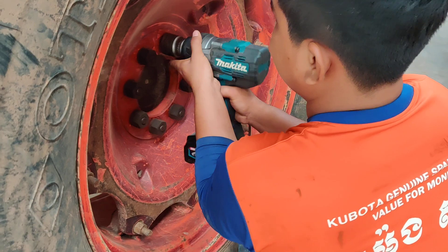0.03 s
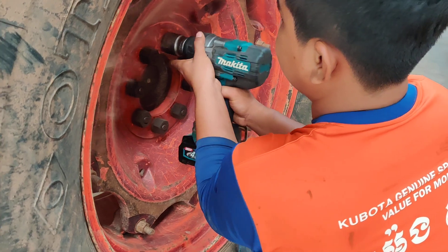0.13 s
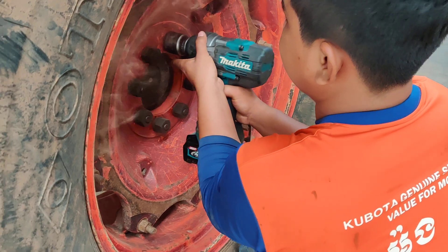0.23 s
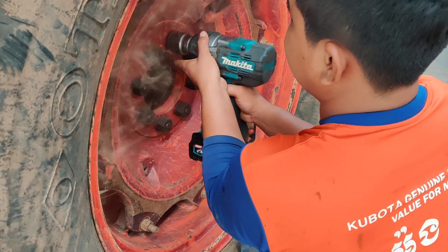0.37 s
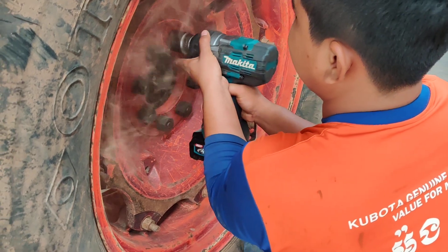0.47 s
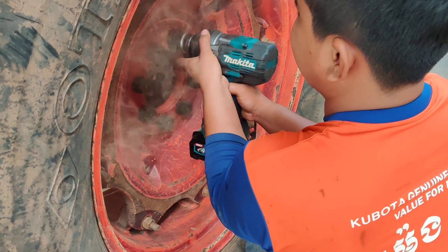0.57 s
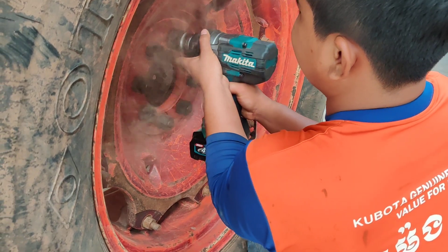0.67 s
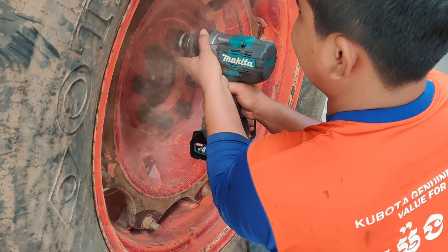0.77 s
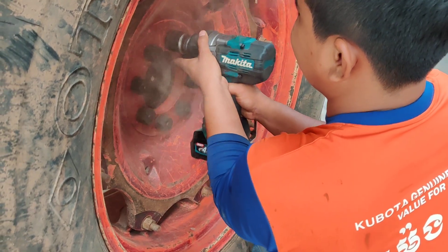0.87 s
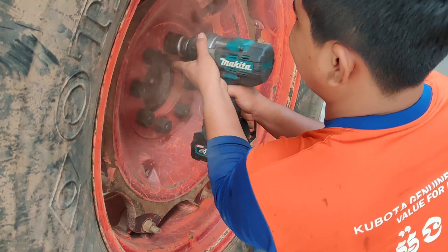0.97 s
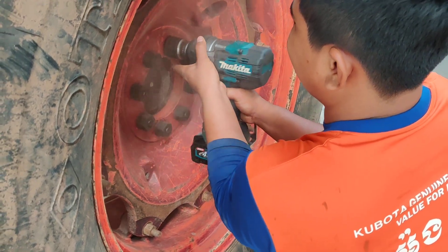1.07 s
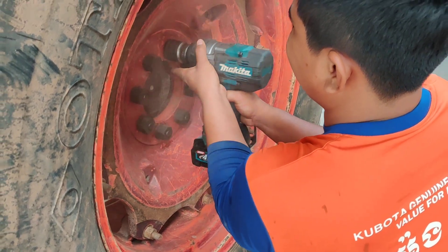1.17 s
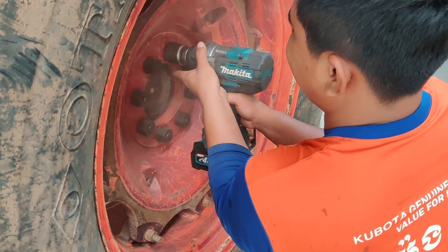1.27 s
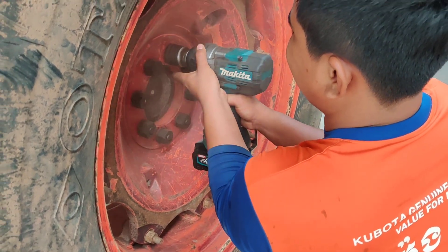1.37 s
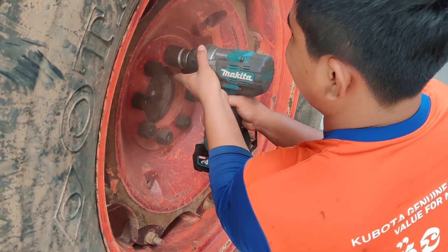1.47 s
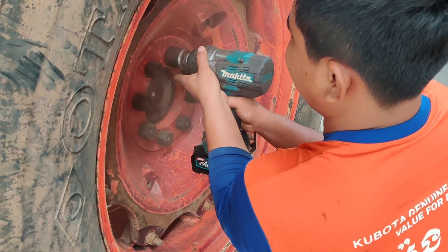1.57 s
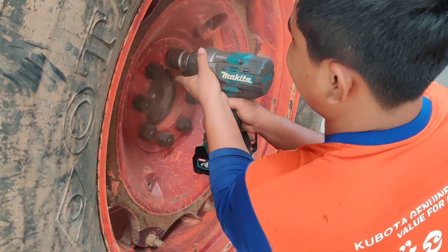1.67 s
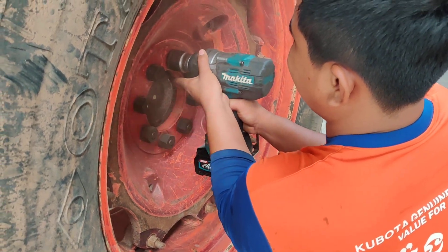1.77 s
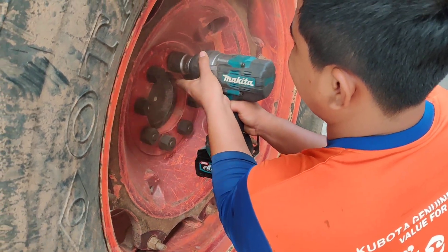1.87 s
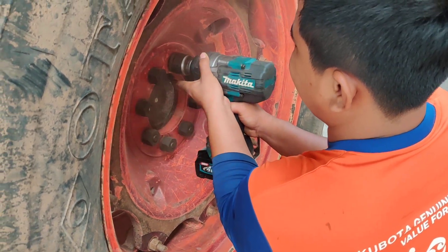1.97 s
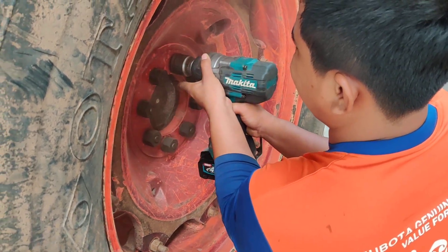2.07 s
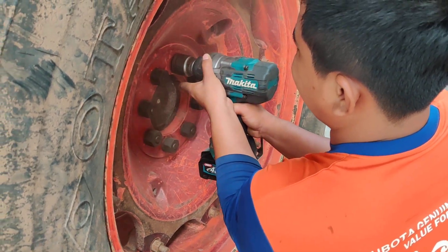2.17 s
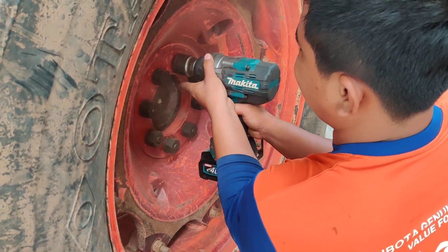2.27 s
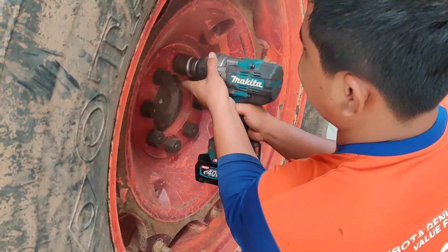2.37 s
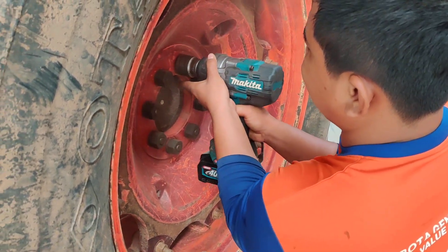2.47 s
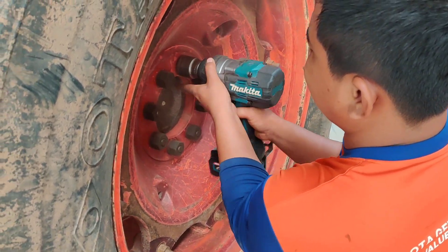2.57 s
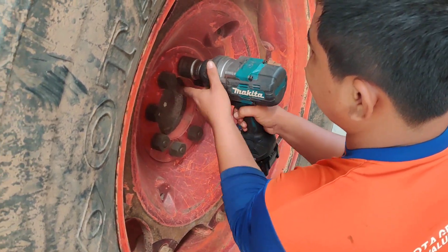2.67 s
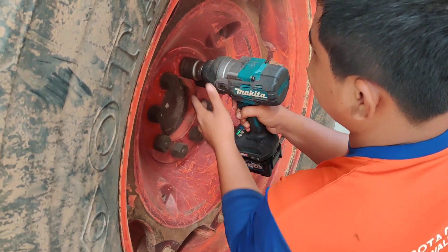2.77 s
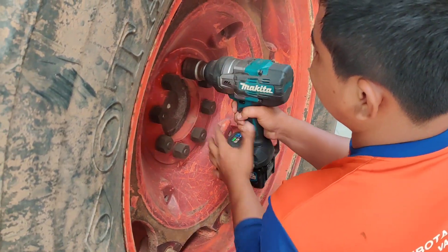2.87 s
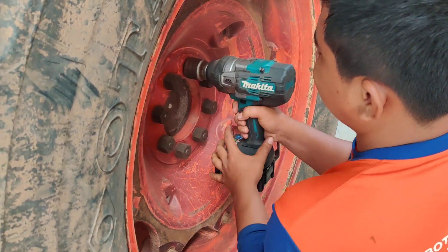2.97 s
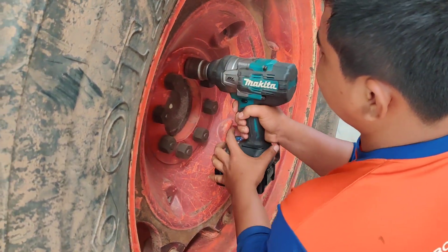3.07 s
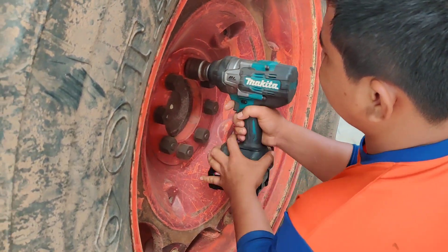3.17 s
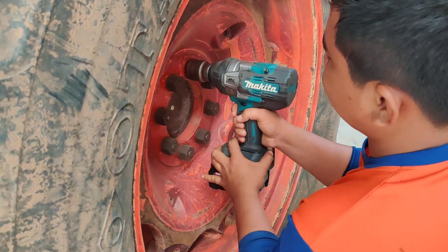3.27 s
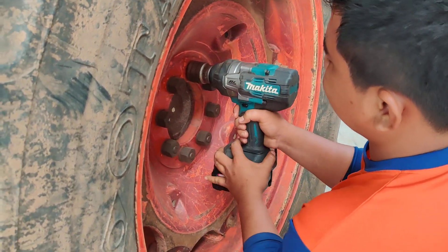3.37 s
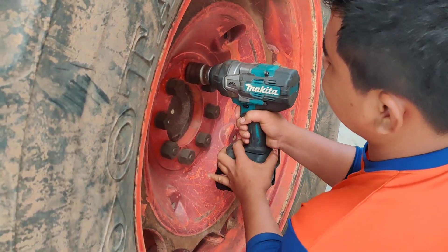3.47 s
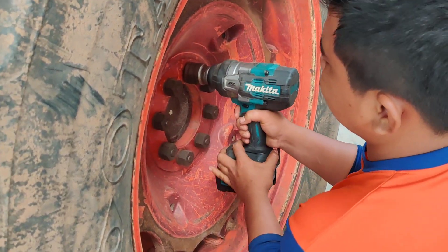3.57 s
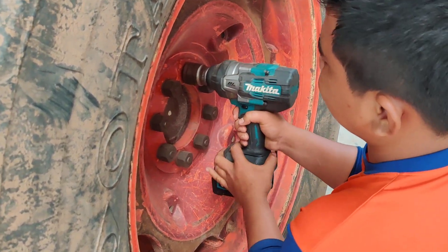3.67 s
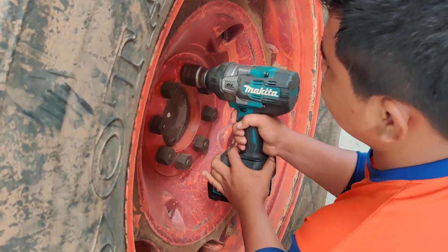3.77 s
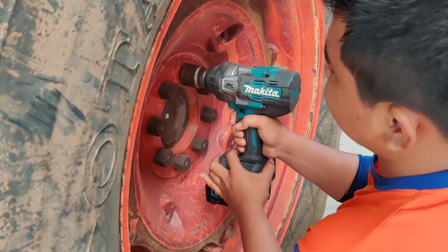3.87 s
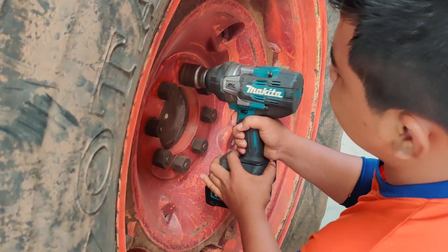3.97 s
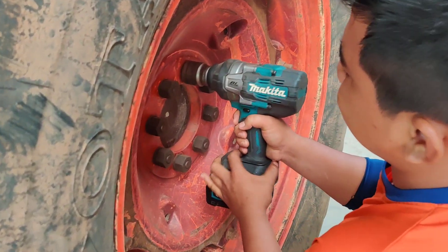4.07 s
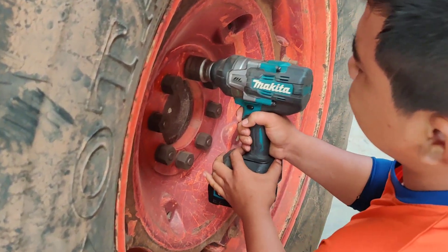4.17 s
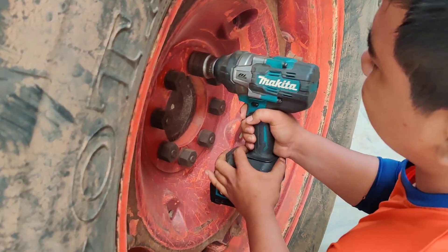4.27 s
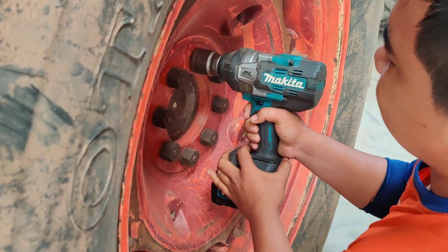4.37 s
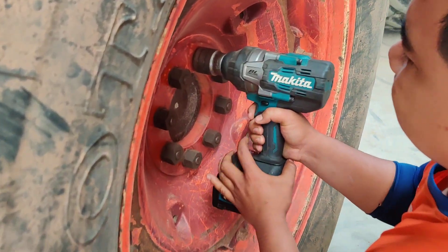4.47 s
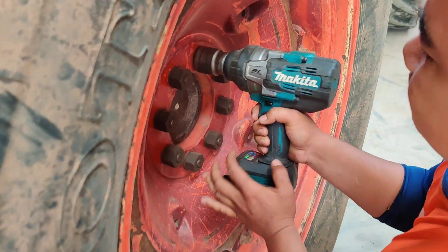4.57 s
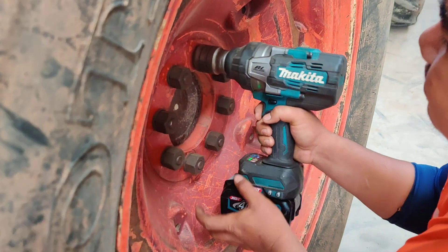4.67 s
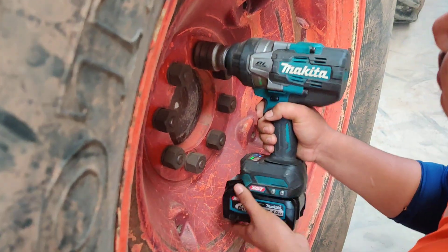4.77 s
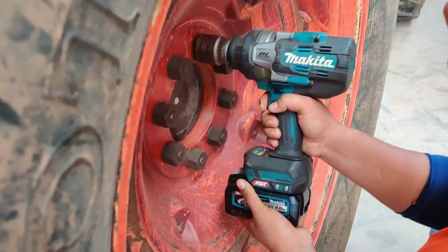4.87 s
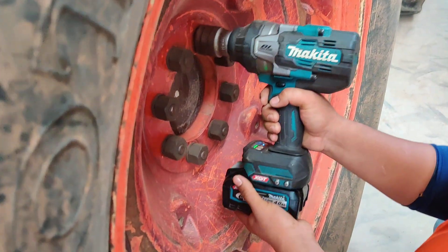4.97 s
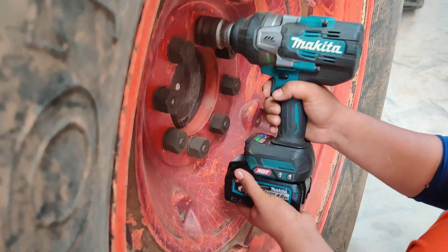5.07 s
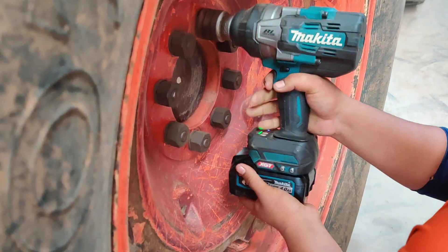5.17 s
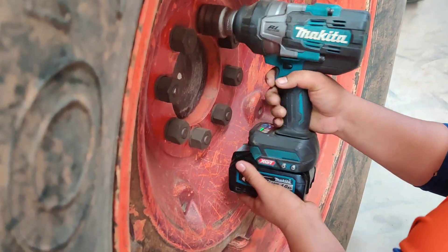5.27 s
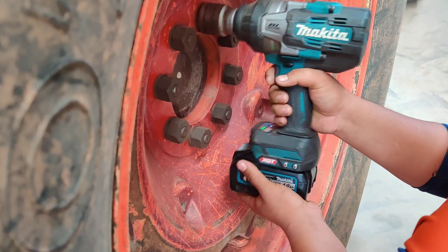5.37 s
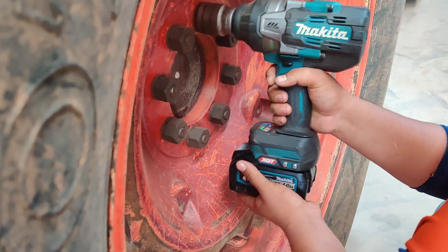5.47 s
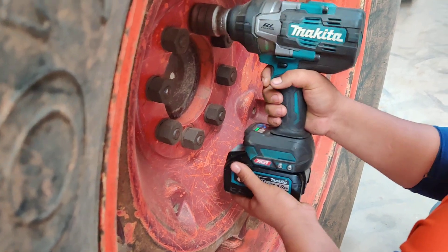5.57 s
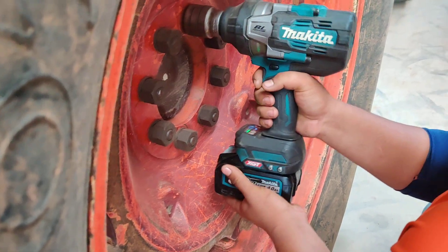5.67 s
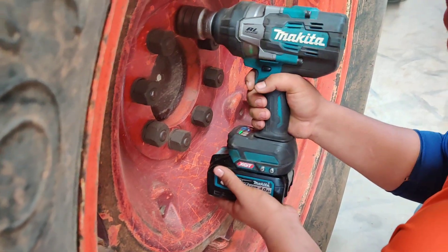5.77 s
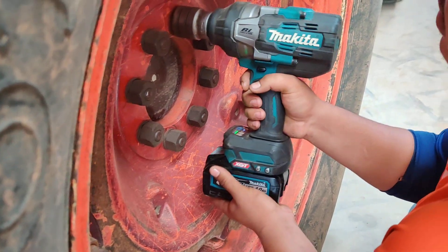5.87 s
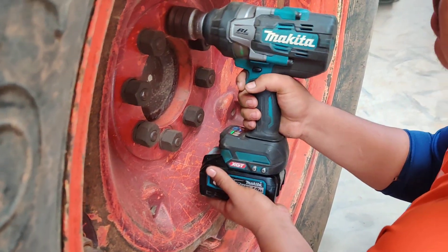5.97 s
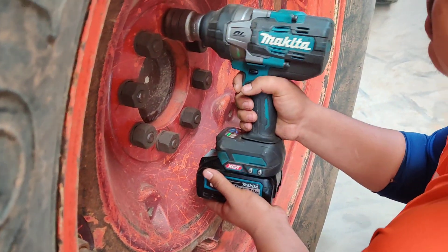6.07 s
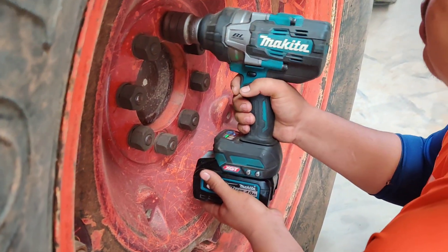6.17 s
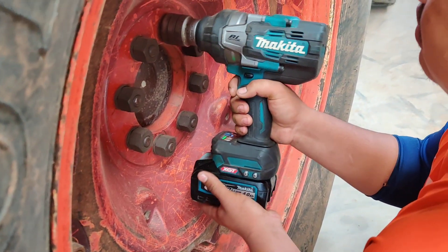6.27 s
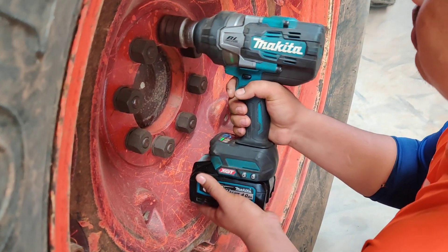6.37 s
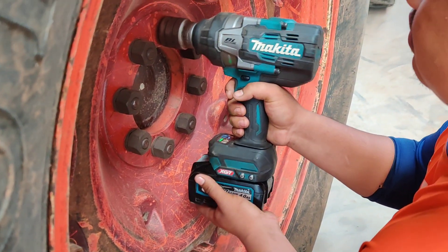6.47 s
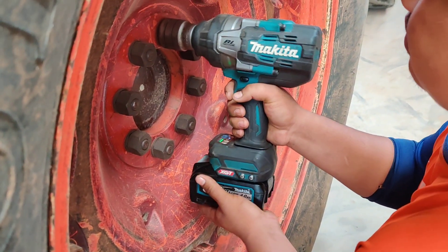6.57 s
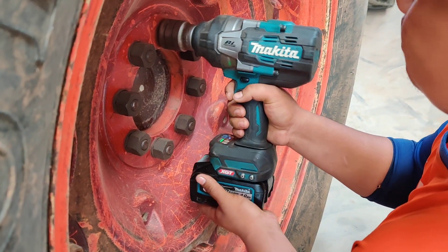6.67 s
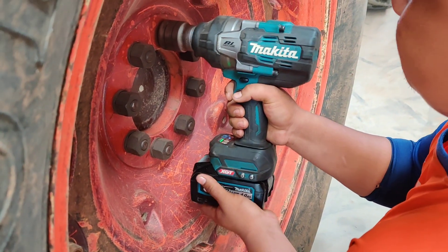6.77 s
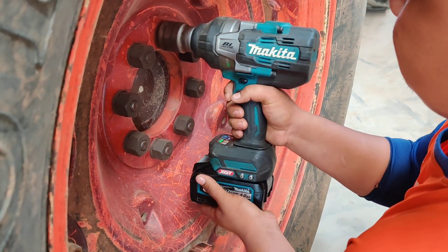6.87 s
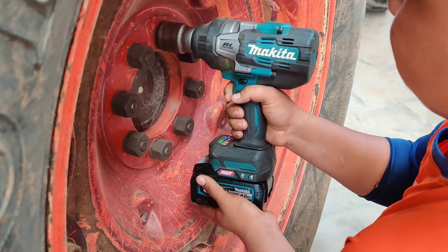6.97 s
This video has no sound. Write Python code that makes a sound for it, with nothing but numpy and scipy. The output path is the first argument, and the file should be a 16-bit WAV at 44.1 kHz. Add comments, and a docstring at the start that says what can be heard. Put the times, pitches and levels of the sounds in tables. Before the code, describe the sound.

Silence for about 0.15 seconds, then an impact wrench bites on a tractor's wheel nut, swelling to full force within a few tenths. It hammers at about 39 blows a second, fusing into a rough, buzzing metallic roar with bright ringing between 2 and 6 kHz. The two close microphones overload: gritty treble spray, low crackle, thumping offset jumps. Brief slips soften it near 0.3, 1.0, 1.7 and 2.0 seconds. At 2.5 it stops; the loose socket chatters in dense light knocks, surging around 2.7 to 2.9, with short bright cracks at 2.6 and just before 3.0. Hammering resumes at 3.0, pauses at 3.3 for quieter chatter, bursts at 3.5, and breaks for an instant at 3.6. From 3.64 it runs continuously past 7 seconds, crackling harder near 4.6 and 4.95, dipping at 4.3 and 4.8, then pulsing gently in an even rhythm, ring gradually fading, ending mid-hammering.

```python
"""A cordless impact wrench hammers on a tractor's wheel nut, about 39 blows a second, close to two microphones.
Each blow excites noise-fed modes of socket, nut and wheel over a denser clang.
It also overloads both microphones: treble splatter, low crackle and jumps in offset.
Three times the hammering stops and the loose socket chatters in dense light knocks.
The hardest single knocks, around the pauses and at starts of runs, are short bright cracks."""
import sys
import numpy as np
from scipy import signal
from scipy.fft import rfft, irfft
from scipy.io import wavfile
from scipy.ndimage import uniform_filter1d

SR = 44100
rng = np.random.default_rng(int(sys.argv[2]) if len(sys.argv) > 2 else 0)


def transcribe(u):
    """Save the signal u as a 16-bit wav file named by the first command-line argument.

    u: samples, shape (n,) or (channels, n), limited to [-1, 1]; the rate is SR.
    q: integer samples, one column per channel.
    """
    v = np.clip(np.atleast_2d(u).T, -1, 1)
    q = np.round(v * 32767).astype(np.int16)
    wavfile.write(sys.argv[1], SR, q)


N = 310154
TIME = np.arange(N) / SR  # s
FREQ = np.fft.rfftfreq(N, 1 / SR) + 1e-3  # Hz, kept above 0 for the logarithm

# runs of hammering: (start [s], soft start [dB], base ring [dB], base treble splatter [dB],
# base low crackle [dB], ring left minus right [dB])
RUNS = [(0.155, 12.5, -12.5, -15, -26.5, -0.5), (3.02, 0.5, -16.5, -16, -28, 0.5),
        (3.515, 1, -14.5, -14, -26.5, -2), (3.635, 3, -15, -14, -28.6, 1)]
# the nut gives way and the hammer rests until the next run: (time [s])
STOPS_S = (2.52, 3.31, 3.59)
# colour of the two microphone ports: (frequency [Hz], left minus right [dB])
PORTS = [(100, -3.5), (600, -2.5), (2000, -1), (4600, -0.5), (5600, -8.5), (7000, -7.5), (8000, 0),
         (9000, 5), (12000, 0.5), (15500, 0)]
# treble overload spectrum: (frequency [Hz], relative level [dB])
SPLATTER = [(500, 1.5), (2000, -7.5), (5000, -4.5), (7500, -9), (9000, -6), (11500, -5.5), (13000, -4),
            (14500, -1), (15700, -1)]


def undb(db):
    """Decibels to gain."""
    return 10 ** (np.asarray(db) / 20)


def curves(table):
    """Columns of a table, joined by straight lines in time."""
    s, *columns = np.transpose(table)
    return [np.interp(TIME, s, column) for column in columns]


def unit(x):
    """Scale to rms 1."""
    return x / np.sqrt(np.mean(x ** 2))


def pan(db):
    """Left and right gains for a level difference."""
    return undb(np.array([[1], [-1]]) * db / 2)


def shape(points):
    """Decibels at every frequency, interpolated over log frequency from (Hz, dB) points."""
    hz, db = np.transpose(points)
    return np.interp(np.log(FREQ), np.log(hz), db)


def resonance(hz, width_hz):
    """Response of one damped mode, gain 1 at its centre."""
    return 1 / (1 + 1j * (FREQ ** 2 - hz ** 2) / (FREQ * width_hz))


def radiation():
    """Small steel parts radiate little bass."""
    return 1 / (1 + (1500 / FREQ) ** 4)


def filtered(x, response):
    """Pass a sound through a frequency response."""
    return irfft(rfft(x) * response, N)


def lag(x, seconds):
    """One-pole smoothing: an impulse becomes a decay."""
    pole = np.exp(-1 / (SR * seconds))
    return signal.lfilter([1 - pole], [1, -pole], x)


def noise():
    """Unrelated white noise at the two ports."""
    return rng.standard_normal((2, N))


def walk(rate_hz):
    """Random levels held 1 / rate_hz and slewed twice; spread near 1."""
    hold = int(SR / rate_hz)
    held = np.repeat(rng.standard_normal(N // hold + 1), hold)
    return 1.46 * uniform_filter1d(uniform_filter1d(held, hold), hold)[:N]


def swell(s, half_s):
    """Smooth bump of height 1 around a moment."""
    return np.exp(-((TIME - s) / half_s) ** 2)


def bursts(at, scatter_db, attack_s, decay_s):
    """Envelope of uneven blows; the two ports feel each blow partly alike."""
    left, right, common = rng.standard_normal((len(at), 3)).T
    kicks = np.zeros((2, N))
    kicks[:, at] = undb(scatter_db * (np.array([left, right]) + common) / np.sqrt(2))
    return unit(lag(lag(kicks, attack_s), decay_s))


def hammering():
    """1 while the nut resists and the hammer strikes, 0 while the socket is loose."""
    started = sum(1. * (TIME >= run[0]) for run in RUNS)
    stopped = sum(1. * (TIME >= s) for s in STOPS_S)
    return started - stopped


def blow_samples(bite, jitter_s):
    """The hammer drops onto the anvil once per turn of its cam, as long as the nut resists."""
    # hammer speed: (time [s], rate [blows/s])
    speed = [(0.16, 39.28), (0.8, 38.65), (1.4, 39.47), (2.2, 39.33), (2.4, 38.77), (3.6, 37.9),
             (3.8, 38.62), (4.8, 38.43), (5.0, 38.79), (5.8, 38.62), (6.2, 38.84), (6.4, 38.08),
             (6.6, 38.93), (7.0, 38.61)]
    first_blow_s = 0.1626
    turns = np.cumsum(curves(speed)[0]) / SR
    turns -= np.interp(first_blow_s, TIME, turns)
    blow_s = np.interp(np.arange(int(turns[-1]) + 1), turns, TIME)
    blow_s = blow_s + jitter_s * rng.standard_normal(len(blow_s))
    at = np.clip((blow_s * SR).astype(int), 0, N - 1)
    return at[bite[at] > .5]


def effort():
    """Runs build to full force, dip at slips and change at pushes: drives ring, overload and jolts (dB)."""
    # the socket slips and blows land softer: (time [s], half-length [s], ring depth [dB])
    slips = [(0.308, 0.036, 7.5), (0.975, .025, 4), (1.083, 0.031, 2), (1.67, .04, 5), (1.97, 0.039, 8),
             (3.076, 0.019, 8), (3.601, 0.023, 16), (4.333, 0.026, 6), (4.837, 0.024, 7),
             (6.715, 0.065, 3.5), (7.03, 0.045, 4.5)]
    # the tool is leant on: (time [s], half-length [s], ring change [dB], low crackle change [dB])
    pushes = [(0.53, 0.03, -1.5, 1), (0.907, 0.046, 0, 0.5), (1.3, 0.28, 1, -0.4), (1.786, 0.083, -1, 3),
              (2.06, 0.055, 3, -0.6), (3.762, 0.2, 0.8, .3), (3.965, 0.079, 1, 1), (4.568, 0.2, -0.34, 3),
              (4.954, 0.068, 2.5, 6)]
    build_s = 0.091  # time constant of the soft start, in dB
    fade_db_per_s, wobble_db = 0.48, 0.63  # ring weakens through a run; tool rocks in the hands
    slip_share = 0.21  # part of a slip's depth that the overload follows
    give_db, give_s = 4, 0.033  # blows next to a stop lose low end: depth, half-length
    # late in the last run the nut turns steadily and the ring dips in an even rhythm
    turning_from_s, turning_period_s, turning_dip_db, turning_dip_s = 4.345, .158, 2, 0.03
    jolt_full_db, jolt_give_db = -11, 17  # offset jumps at full force; loss next to a stop
    jolt_slope, jolt_push = 2.2, 0.66  # dB lost per dB of soft start; dB gained per dB of crackle change

    runs = np.array(RUNS)
    current = np.maximum(np.searchsorted(runs[:, 0], TIME, side="right") - 1, 0)
    start, soft, ring, splatter, crackle, side_db = runs[current].T
    age = np.maximum(TIME - start, 0)
    weak = soft * np.exp(-age / build_s)
    slip = sum(db * swell(s, half_s) for s, half_s, db in slips)
    turning = np.arange(turning_from_s, TIME[-1], turning_period_s)
    slip = slip + turning_dip_db * sum(swell(s, turning_dip_s) for s in turning)
    push_ring, push_low = sum(np.outer(dbs, swell(s, half_s)) for s, half_s, *dbs in pushes)
    give = sum(swell(s, give_s) for s in STOPS_S)

    ring_db = ring - weak - fade_db_per_s * age - slip + push_ring + wobble_db * walk(rate_hz=13)
    eased = weak + slip_share * slip
    crackle_db = crackle - eased + push_low - give_db * give
    jolt_db = jolt_full_db - jolt_slope * weak + jolt_push * push_low - jolt_give_db * give
    return ring_db, side_db, splatter - eased, crackle_db, jolt_db


def clang(at):
    """Blows ring socket, nut and wheel; the seating decides which modes speak most."""
    # seating of the socket on the nut: (time [s], grip [0 first, 1 second, 2 third])
    seating = [(0.15, 0.038), (0.9, 0.43), (1.3, 0.6), (1.8, 0.74), (2.6, 0.33), (3.5, 0.83), (3.9, 0.72),
               (4.4, 1.4), (4.9, 1.26), (5.7, 1.73), (7.03, 1.52)]
    # modes of socket, nut and wheel: (frequency [Hz], width [Hz], relative level in first, second
    # and third grip [dB, dB, dB], left minus right [dB])
    steel_modes = [(2173, 120, -5.5, 0.5, 6.5, 2), (2730, 55, -18, -2, 10, 2.5),
                   (2923, 99, -16, -0.5, 6.5, -2), (2987, 46, -5, 13.5, 1.5, 7.5),
                   (3277, 44, -0.5, 6.5, 3.5, -6.5), (3840, 27, 1, -7, 4, 16),
                   (3890, 41, 5.5, 9.5, 12, 5.5), (4104, 45, 1, -12, 1, 2), (4194, 54, 4, 7.5, 6, 0),
                   (4300, 79, -4, -6, 0, -2), (4590, 48, -2, -3, -8, 8), (4870, 120, -2, -15, 7, 2),
                   (4953, 33, 7, 9.5, 6.5, 9), (5650, 52, 9.5, 2, 10.5, -2), (5580, 24, 8.5, -8.5, 0, -14),
                   (7930, 176, -10.5, 5.5, 7.5, -5.5)]
    # dense higher-order ringing under the modes: (frequency [Hz], relative level [dB])
    dense_colour = [(300, -21), (800, -8.5), (1300, -8.5), (1900, -1), (2600, -2.5), (4200, 1.5),
                    (5700, -2.5), (6300, -4), (7700, -1), (8600, -14), (11000, -10), (15500, -74)]
    seat = curves(seating)[0]
    force = bursts(at, scatter_db=3.1, attack_s=0.0056, decay_s=0.027)
    dense = filtered(force * noise(), undb(shape(dense_colour)) * pan(shape(PORTS)))
    ring = 0
    for hz, width_hz, *grip_db, side_db in steel_modes:
        wobble_db = 1.9 * walk(rate_hz=11)  # the socket shifts on the nut, so each mode comes and goes
        mode = filtered(force * noise(), resonance(hz, width_hz) * radiation())
        level_db = np.interp(seat, np.arange(len(grip_db)), grip_db) + wobble_db
        ring = ring + mode * undb(level_db) * pan(side_db)
    return unit(undb(-1.2) * dense + ring)


def overload(at, splatter_db, crackle_db, loose):
    """Blows drive the microphones past their range: a punch, a low crack and gritty treble."""
    # low overload spectrum: (frequency [Hz], relative level [dB])
    crackle_colour = [(60, -3), (200, 3.5), (500, 0.5), (1000, 1), (2000, -1.5), (4000, -9), (9000, -33.5)]
    # second, then third harmonic of the socket's mode, added by overload:
    # (width [Hz], level over the splatter [dB], left minus right [dB])
    harmonic_table = [(70, -7, 8), (100, -8, 8)]
    socket_hz = 4962
    fizz_db = -41.5  # faint treble while the socket is loose
    ports = pan(shape(PORTS))
    grit = undb(2.0 * unit(lag(noise(), 0.0014)))
    spray = bursts(at, scatter_db=2.13, attack_s=.0004, decay_s=0.02)
    fizz = unit(grit) * (spray * undb(splatter_db) + loose * undb(fizz_db))
    harmonics = 0
    for multiple, (width_hz, db, side_db) in enumerate(harmonic_table, start=2):
        harmonics = harmonics + undb(db) * resonance(multiple * socket_hz, width_hz) * pan(side_db)
    splatter = filtered(fizz * noise(), undb(shape(SPLATTER)) * ports)
    splatter = splatter + filtered(fizz * noise(), harmonics)
    splatter = unit(splatter) * np.sqrt(np.mean(fizz ** 2))

    crack = bursts(at, scatter_db=3.0, attack_s=0.000096, decay_s=0.0032)
    crackle = filtered((crack + 0.94 * spray * grit) * noise(), undb(shape(crackle_colour)) * ports)
    punch = -bursts(at, scatter_db=2.0, attack_s=.0001, decay_s=0.00032)  # short, one-sided pulse
    low = undb(3.5) * unit(crackle) + undb(-4.5) * punch
    return splatter * pan(1.5) + low * undb(crackle_db)


def jolts(at, size_db, dip_s, dip_size, swing, settle_s):
    """A blow pulls each microphone's offset down; it leaps back, shifts once more and rests."""
    threshold_db = -24  # weaker blows leave the offset where it is
    out = np.zeros((2, N))
    size = undb(size_db)
    at = at[size_db[at] > threshold_db]
    index = np.maximum(np.searchsorted(at, np.arange(N), side="right") - 1, 0)
    age = TIME - at[index] / SR
    for side in range(2):
        dip, interim, rest, early, late = rng.standard_normal((len(at), 5)).T
        # high and low rests tend to alternate
        rest = unit(np.tanh(signal.lfilter([1], [1, np.clip(swing, 0, .9)], rest)))
        dip_end = dip_s * np.exp(.5 * early)
        settled = dip_end + settle_s * np.exp(.7 * late)
        stages = [(0.44 * dip - dip_size)[index], (0.5 * rest + 0.4 * interim)[index]]
        offset = np.select([age < dip_end[index], age < settled[index]], stages, rest[index])
        out[side] = offset * size[at][index] * (age >= 0)
    coupling = 1j * FREQ / (1j * FREQ + 0.97)  # the offset leaks away through the input coupling
    return filtered(lag(out, 0.00021), coupling) * pan(-2.3)


def drift():
    """Once overloaded, each microphone's offset also sways slowly."""
    begun = np.clip((TIME - .27) / .1, 0, 1)
    return begun * undb(-19) * np.array([walk(rate_hz=17), walk(rate_hz=14)])


def hard_knocks(decay_s, tail_db, tail_s):
    """Hardest single knocks: short bright cracks with a tail of overload splatter."""
    # around the pauses and at the starts of runs: (time [s], envelope peak before colour [dB])
    knocks = [(2.583, -12), (2.944, -12), (2.957, -16), (2.983, -17), (2.996, -13), (3.085, -15.5),
              (3.519, -11.5), (3.531, -16), (3.635, -11.5)]
    crack, tail = np.zeros(N), np.zeros(N)
    for s, db in knocks:
        age = np.maximum(TIME - s, 0)
        crack += (TIME >= s) * undb(db) * np.exp(-age / decay_s)
        tail += (TIME >= s) * undb(db + tail_db) * np.exp(-age / tail_s)
    colour = undb(shape([(200, 2), (1000, 4), (4000, 7.5), (7800, 9.5), (9500, -4), (15500, -3)]))
    return filtered(crack * noise(), colour) + filtered(tail * noise(), undb(shape(SPLATTER)))


def rattle():
    """With no load the socket chatters on the nut in dense, light knocks."""
    # colour of the loose socket's chatter: (frequency [Hz], relative level [dB])
    chatter_colour = [(130, -20.5), (350, -9.5), (750, -18), (1200, -14), (1900, -1.5), (2600, -2.5),
                      (4300, 1.5), (5300, -1.5), (6100, -5), (7200, -4.5), (8100, -7), (8700, -16.5),
                      (12000, -29), (15500, -42)]
    # its resonances: (frequency [Hz], width [Hz], relative level [dB])
    chatter_modes = [(2980, 67, 6.2), (3290, 28, 3), (3890, 90, 8.9), (4850, 29, 4.6)]
    count = 1400
    knocks = np.linspace(0, N - 1, count) + SR * .002 * rng.standard_normal(count)
    at = np.clip(knocks, 0, N - 1).astype(int)
    force = bursts(at, scatter_db=0.5, attack_s=.0003, decay_s=0.034)
    ringing = sum(undb(db) * resonance(hz, width_hz) for hz, width_hz, db in chatter_modes) * radiation()
    dense = filtered(force * noise(), undb(shape(chatter_colour)))
    return unit(dense + filtered(force * noise(), ringing))


def chatter_level(loose):
    """The chatter idles between runs and surges as the socket spins up."""
    # surges: (start [s], length [s], level before smoothing [dB])
    surge_table = [(2.53, 0.081, -19.5), (2.61, .07, -26), (2.659, .1, -12), (2.767, 0.16, -15),
                   (2.956, .065, -25), (3.342, 0.022, -16), (3.475, 0.039, -18)]
    idle_db, surge_s = -24.5, 0.022  # level between surges; rise and fall time constant
    surges = sum(undb(db) * ((TIME >= s) & (TIME < s + length_s)) for s, length_s, db in surge_table)
    return lag(loose * undb(idle_db) + surges, surge_s)


def scene():
    """Silence, then the trigger is pulled: hammering and overload, with loose chatter in the pauses."""
    bite = hammering()
    loose = (1 - bite) * (TIME > STOPS_S[0])
    at = blow_samples(bite, jitter_s=.0001)
    ring_db, side_db, splatter_db, crackle_db, jolt_db = effort()
    steel = clang(at) * undb(ring_db) * pan(side_db)
    distortion = overload(at, splatter_db, crackle_db, loose)
    offset = jolts(at, jolt_db, dip_s=0.00201, dip_size=0.48, swing=0.46, settle_s=.007) + drift()
    cracks = hard_knocks(decay_s=0.006, tail_db=-5.5, tail_s=0.022)
    chatter = rattle() * chatter_level(loose) * pan(0.5)
    running = np.clip((TIME - .157) / .006, 0, 1)
    return running * (steel + distortion + offset + cracks + chatter)


def record(dry):
    """Soft saturation rounds the highest peaks; a steep low-pass cuts the top."""
    top_hz = 15760
    rounded = .92 * dry / (1 + np.abs(dry) ** 6) ** (1 / 6)
    low_pass = signal.ellip(14, .2, 80, top_hz, fs=SR, output="sos")
    return signal.sosfilt(low_pass, rounded)


dry = scene()
out = record(dry)
transcribe(out)
```